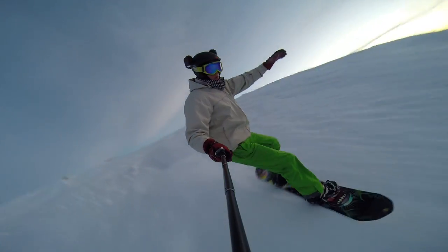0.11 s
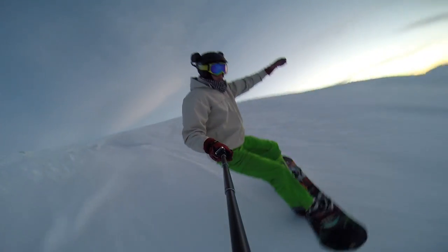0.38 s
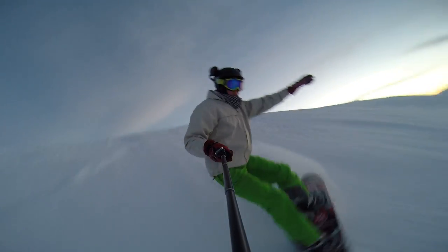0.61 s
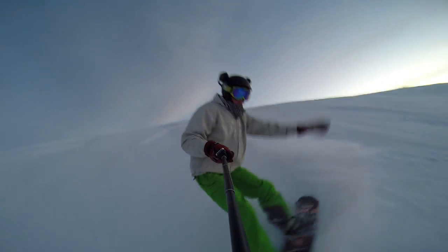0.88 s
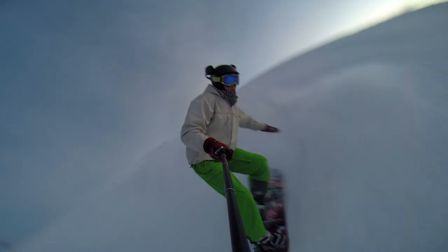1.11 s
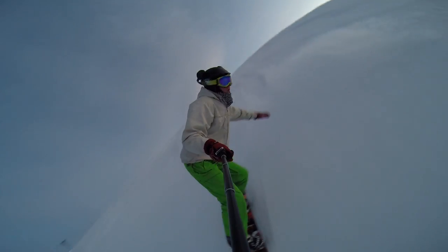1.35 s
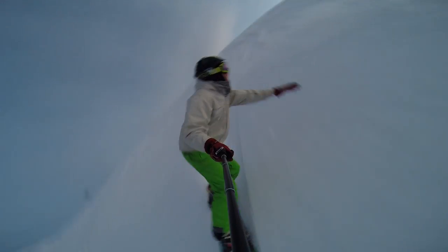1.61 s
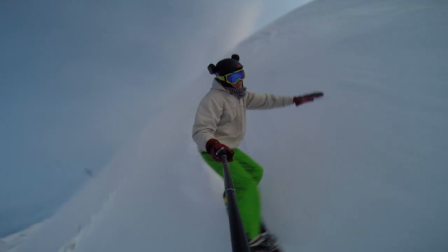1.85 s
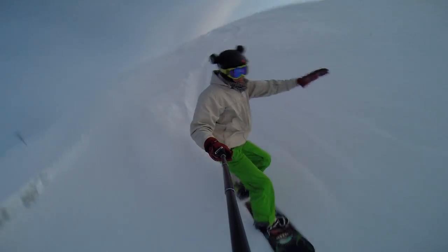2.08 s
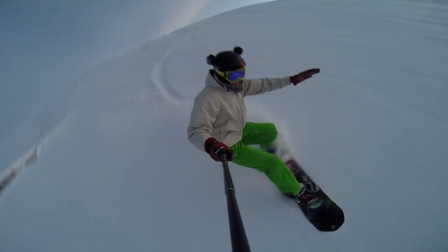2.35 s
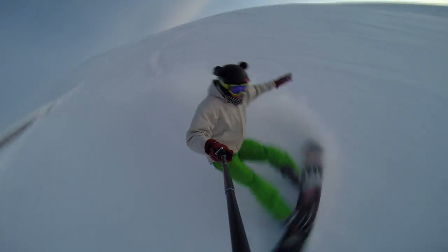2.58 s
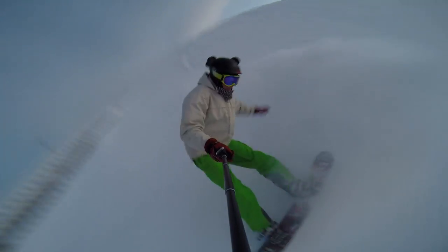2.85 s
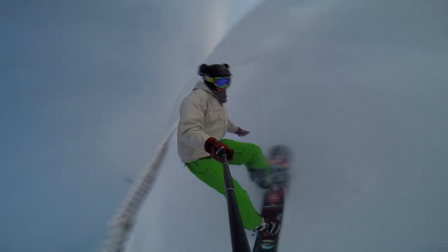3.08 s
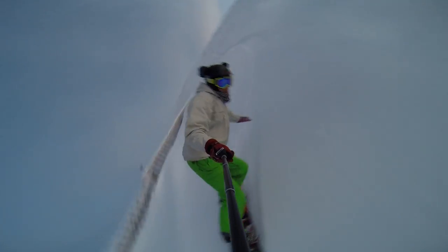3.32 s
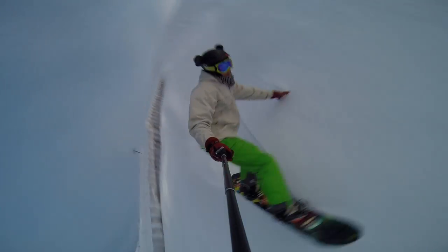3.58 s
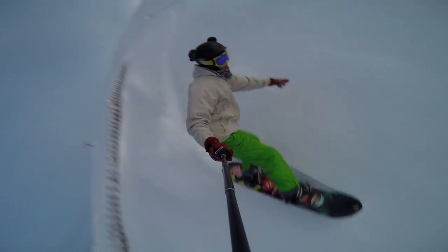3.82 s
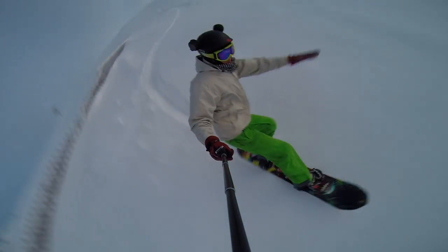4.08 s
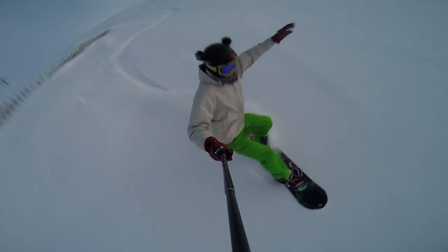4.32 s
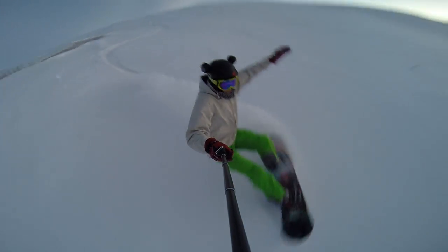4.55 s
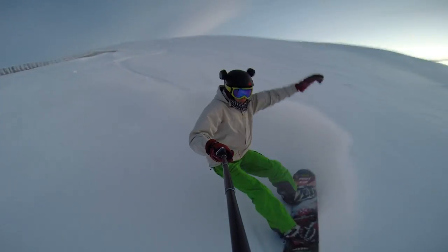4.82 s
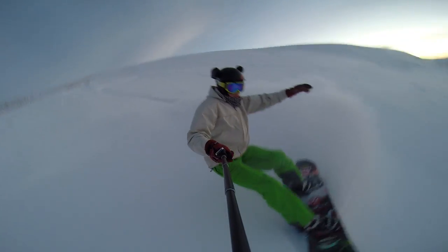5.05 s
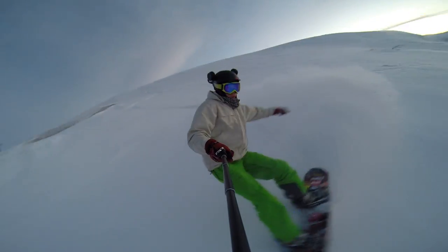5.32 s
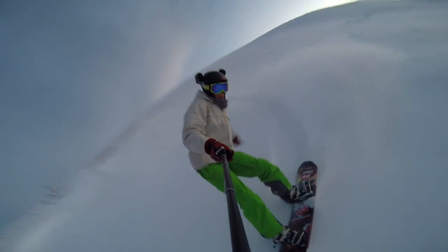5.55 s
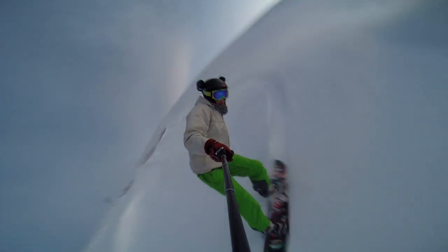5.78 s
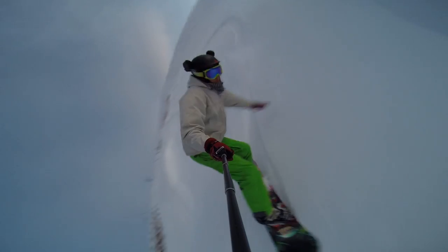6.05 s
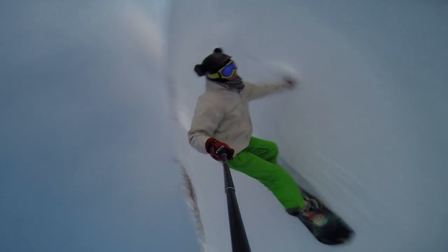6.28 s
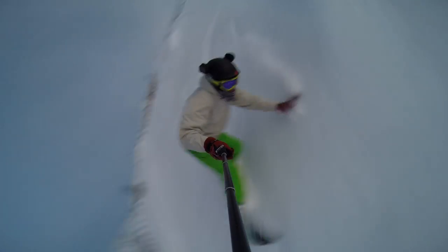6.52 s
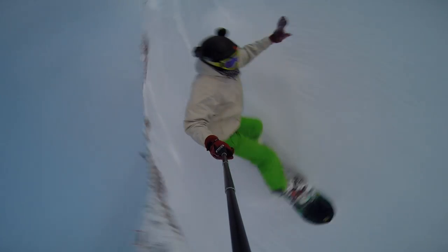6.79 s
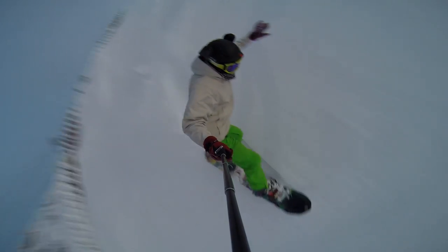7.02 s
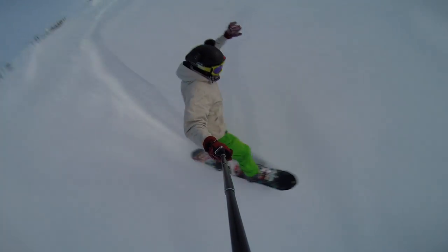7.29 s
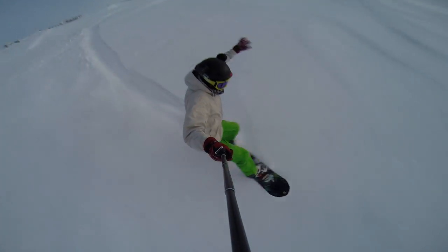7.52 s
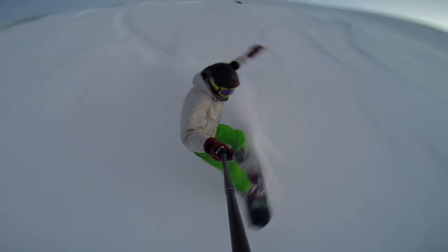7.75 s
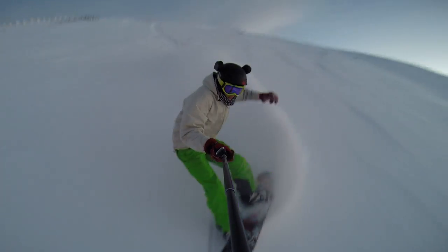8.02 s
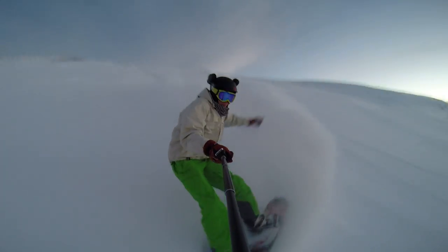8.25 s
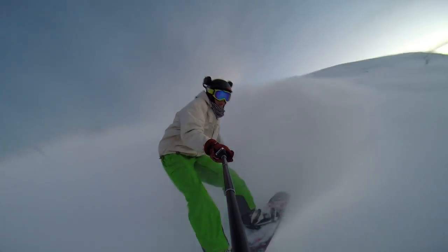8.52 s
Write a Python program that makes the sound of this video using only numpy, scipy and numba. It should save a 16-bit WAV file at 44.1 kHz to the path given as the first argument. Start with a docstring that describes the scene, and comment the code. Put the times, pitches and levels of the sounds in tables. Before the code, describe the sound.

A snowboard carves through powder with swelling, grainy hiss over low buffeting wind, with small icy ticks and one hard knock on a hollow pole.

```python
"""A rider carves powder snow holding a cased camera on a pole: noise with grains in it hisses through
the resonances of the case, with a fine top and a dull scrape. Spray rattles on the case in dense bursts,
grains of ice tick on it and blows ring the modes of the pole. Air sways the pole, sheds humming eddies,
buffets and whistles as moving bands of noise; the camera adds hiss, a faint whine and treble fizzes."""
import sys
import numpy as np
from scipy import signal
from scipy.fft import rfft, irfft, next_fast_len
from scipy.io import wavfile
from scipy.ndimage import uniform_filter1d
from numba import njit

SR = 44100
rng = np.random.default_rng(int(sys.argv[2]) if len(sys.argv) > 2 else 0)


def invert_db(level):
    """Linear amplitude ratio for a level in decibels (20 dB per decade), elementwise."""
    return 10 ** (np.asarray(level, dtype=float) / 20)


def store_pcm(level_fs):
    """Save levels as 16-bit WAV."""
    pcm = np.round(np.clip(level_fs, -1, 1) * 32767).astype(np.int16)
    wavfile.write(sys.argv[1], SR, np.atleast_2d(pcm).T)


N = 380573  # samples

# Spectrum of the preamplifier hiss. Each row: frequency in Hz, relative density in dB per Hz.
HISS_SPECTRUM = [(100, -4), (140, -8.5), (450, -9.5), (820, -16), (1250, -10), (1900, -21), (2900, -11),
                 (3900, -20), (5600, -12.5), (6200, -21), (10000, -23.5), (11500, -26), (12600, -19),
                 (14000, -23), (15000, -25), (15300, -43)]
# Whine of the electronics. Each row: tone in Hz, level in dB, level in dB of a twin one frame rate higher.
WHINE_TONES = [(2907, -78, -66), (5844, -69, -76), (11688, -73, -74), (14625, -72, -84)]
# Air past pole and case; eddies shed faster as the pole sweeps round.
# Each row: time in seconds, eddy pitch in Hz, eddy level in dB, turbulence level in dB, whistle level in dB.
AIR_STREAM = [(0, 50, -47.5, -55.5, -57), (.41, 50, -40.5, -62, -71), (1.0, 45.6, -39, -64, -59),
              (1.25, 49.6, -49, -67, -58.5), (1.75, 53.4, -36, -62, -55), (2.25, 50.4, -52, -73.5, -58),
              (2.55, 56, -35.5, -66, -58.5), (2.82, 48, -43, -54.5, -59), (3.2, 52, -51, -92, -71),
              (3.48, 50, -50, -57, -54), (3.6, 50.4, -45.5, -73, -66), (3.85, 52, -41, -65, -49.5),
              (4.05, 61, -41.5, -63.5, -54), (4.35, 82.7, -36, -68, -48.5), (4.66, 64, -34, -66, -57.5),
              (5.05, 52, -50, -64, -68), (5.65, 50, -47.5, -75, -55.5), (6.1, 47.7, -52.5, -76, -77),
              (6.42, 46, -36, -50, -49.5), (6.65, 46.4, -47, -65.5, -60), (6.92, 50.4, -36, -65, -47),
              (7.3, 64.4, -39.5, -66, -57), (7.5, 90.4, -35, -61.5, -50), (7.68, 89, -42, -54.5, -50),
              (7.85, 119, -39, -49, -44.5), (8.15, 81, -40.5, -53, -54), (8.4, 62, -48, -63.5, -56.5),
              (8.5, 58, -45, -67, -49.5), (8.63, 55, -43, -71, -52)]
# How hard the pole sways in the hand. Each row: time in seconds, level in dB.
POLE_SWAY = [(0.0, -33), (0.55, -41.5), (0.67, -25.5), (0.98, -37), (1.1, -22.5), (1.18, -40), (1.32, -26),
             (1.39, -42), (1.61, -27.5), (1.66, -32), (1.83, -25), (1.87, -32.5), (2.83, -36.5),
             (2.88, -25), (3.32, -35), (3.36, -23.5), (3.51, -23), (3.56, -36.5), (3.82, -26), (3.99, -43),
             (4.08, -34.5), (6.05, -37.5), (6.44, -23.5), (6.47, -17), (6.99, -34), (7.43, -23.5),
             (7.62, -38.5), (8.32, -16), (8.61, -24.5), (8.63, -27)]
# Resonances rung by the wind. Each row: centre in Hz, width in Hz, level in dB.
WIND_RESONANCES = [(290, 12, 3), (380, 35, -3)]
# An eddy tone that climbs in the last turn. Each row: time in seconds, pitch in Hz, level in dB.
HOWL_CURVE = [(7.25, 138, -89), (7.4, 154.6, -49), (7.55, 161, -42), (7.63, 167, -55), (7.7, 182, -37.5),
              (7.8, 202, -44.5), (7.95, 207.4, -61), (8.2, 200.6, -73), (8.4, 196, -77)]
# Short clear puffs of the whistle. Each row: start in seconds, length in seconds, nominal top pitch in Hz,
# level in dB.
WHISTLE_PUFFS = [(1.822, 0.057, 1466, -47), (1.92, 0.085, 1463, -49), (2.472, 0.075, 1390, -55),
                 (2.569, 0.046, 1400, -49.5), (6.901, 0.059, 1600, -45)]
# Modes of the struck pole and case. Each row: frequency in Hz, level in dB, time to fall 60 dB in seconds.
BODY_MODES = [(24.3, -20, 0.32), (58, -5, 0.35), (92, -4, 0.068), (124, 2, 0.052), (177, 2, 0.078),
              (278, -11, 0.18), (391, -3.5, 0.12), (684, -4.5, .04), (920, -5, 0.026), (1300, 1, 0.042),
              (1426, 0.5, 0.021), (1800, 5, 0.016), (2250, 2.5, 0.012), (2520, -0.5, 0.027),
              (3150, 3, 0.015), (3430, -2, 0.016), (4270, -16, 0.011)]
# Blows on the pole. Each row: start in seconds, peak of the high modes in dB, thud gain in dB re that peak,
# upper edge of the contact's band in Hz, time in seconds at which the contact is hardest.
POLE_BLOWS = [(0.5913, -32, -7, 1900, 0.0018), (0.5947, -17, -11, 4130, 0.00087),
              (0.637, -27.5, -20, 3480, 0.0023), (0.64, -35, 11, 2000, 0.0018),
              (6.4423, -4.5, -6.5, 4800, 0.00075), (6.4432, -15.5, -14, 2330, 0.0016),
              (6.454, -20.5, 1, 1730, 0.0018)]
# Single grains of ice on the case. Each row: start in seconds, level in dB, pitch in Hz.
ICE_TICKS = [(0.081, -29.5, 2630), (0.925, -26.5, 4800), (1.7337, -31.5, 2980), (2.071, -27.5, 2800),
             (3.1725, -30, 2630), (3.3204, -27, 1820), (4.6524, -42, 2930), (4.6907, -34, 3300),
             (4.753, -23.5, 3570), (4.805, -26, 2500), (4.81, -29.5, 1300), (4.928, -25.5, 2940),
             (4.938, -30, 2600), (5.7304, -40, 2370), (5.8575, -29, 3220), (6.524, -37, 2930),
             (6.577, -24, 1810), (6.759, -49, 1750), (7.167, -33, 1970), (7.541, -35, 2950),
             (7.9042, -27, 1860), (8.0512, -23.5, 2240), (8.2781, -21.5, 2390)]
# Resonances that colour the snow. Each row: centre in Hz, width in Hz, level in dB.
CASE_RESONANCES = [(2203, 260, 5), (2725, 310, 7.5), (3370, 270, 2), (4667, 240, 3.5), (4946, 290, 0),
                   (5520, 300, -12.5), (6660, 240, -6.5)]
# Sheets of spray thrown on the case. Each row: start in seconds, nominal length in seconds, level in dB,
# icy treble in dB re the sheet, heavy bass in dB re the sheet.
SPRAY_SHEETS = [(0.75, 0.054, -40.5, -25, -13), (2.714, 0.099, -43, -9, -10), (2.953, 0.067, -38, -25, -24),
                (2.963, 0.029, -41, -29, -7), (3.379, 0.1, -44, -23, -8), (3.69, 0.1, -29.5, -1.5, -16),
                (3.784, 0.035, -38, 2.5, -9), (3.84, 0.0098, -51, 9, -18), (6.196, 0.032, -48.5, 2.5, -10),
                (6.268, 0.055, -59.5, 11, -10), (6.302, 0.047, -39.5, -8, -9)]
# Board in the snow. Each row: time in seconds, hiss in dB, fine spray in dB, finest spray in dB,
# dull scrape in dB.
BOARD_CARVE = [(0, -54.5, -67, -66, -64), (.31, -51.5, -67, -69, -72), (.55, -51.5, -64, -60.5, -69),
               (.72, -48.5, -63, -64, -60), (.85, -46, -59, -57, -64), (1.08, -47, -56.5, -59, -63),
               (1.17, -54.5, -67, -68, -71), (1.3, -53, -61.5, -68, -65), (1.75, -53, -61, -62.5, -63.5),
               (2.3, -61, -70, -71, -68), (2.52, -58, -68, -68, -66), (2.8, -44, -56.5, -58.5, -65),
               (3.0, -47.5, -57, -62, -64), (3.13, -60.5, -63.5, -68, -88), (3.45, -54, -58.5, -64, -78),
               (3.94, -50.5, -59.5, -64, -63), (4.13, -55, -58.5, -64.5, -64), (4.35, -59.5, -79, -71, -60),
               (4.59, -56.5, -65, -70, -62), (4.8, -50, -61, -60, -68), (5.2, -49, -64, -60.5, -70),
               (5.67, -46.5, -55.5, -55, -67), (5.94, -47.5, -59, -62, -70), (6.12, -56.5, -60.5, -65, -81),
               (6.37, -47, -63, -65, -58), (6.6, -60, -66, -71, -67), (6.92, -56.5, -70, -72, -61),
               (7.25, -59.5, -65, -69, -64.5), (7.45, -56.5, -69, -72, -58), (7.72, -48.5, -63, -68, -51),
               (8.0, -51, -59.5, -65, -48.5), (8.37, -47.5, -54.5, -60, -57), (8.63, -51.5, -61, -67, -63)]


def unit(x):
    """Scale to rms 1."""
    return x / np.sqrt(np.mean(x ** 2))


def columns(table):
    """Table columns as curves over all samples."""
    s, *rest = np.transpose(table)
    return [np.interp(np.arange(N) / SR, s, c) for c in rest]


@njit
def moving_band(x, hz, width):
    """State-variable band-pass with a moving centre, gain 1 there."""
    y, b, l = np.empty(len(x)), 0., 0.
    for i in range(len(x)):
        g, k = np.tan(np.pi * hz[i] / SR), width / hz[i]
        v = (b + g * (x[i] - l)) / (1 + g * (g + k))
        b, l, y[i] = 2 * v - b, l + 2 * g * v, k * v
    return y


def tuned_noise(hz, first_width, second_width):
    """Noise through two moving band-passes in a row, widths in Hz: a breathy pitch at rms 1."""
    once = moving_band(rng.standard_normal(len(hz)), hz, first_width)
    return unit(moving_band(once, hz, second_width))


def band(x, hz, width_hz):
    """Fixed resonance."""
    return signal.lfilter(*signal.iirpeak(hz, hz / width_hz, SR), x)


def bandpass(x, lo_hz, hi_hz, order=3):
    """Butterworth band with its level left as it falls."""
    return signal.sosfilt(signal.butter(order, [lo_hz, hi_hz], "band", fs=SR, output="sos"), x)


def steep(x, lo_hz, hi_hz, order=3):
    """Band with steep skirts, rms 1."""
    return unit(bandpass(x, lo_hz, hi_hz, order))


def noise():
    """White noise."""
    return rng.standard_normal(N)


def walk(rate):
    """Random levels held 1 / rate s and slewed twice; spread near 1."""
    k = int(SR / rate)
    held = np.repeat(rng.standard_normal(N // k + 1), k)
    return 1.29 * uniform_filter1d(uniform_filter1d(held, k), k)[:N]


def phase(hz):
    """Running phase in radians of a moving pitch."""
    return 2 * np.pi * np.cumsum(hz) / SR


def grains(density, spread_db):
    """Sparse clicks of very uneven size, density per second."""
    hits = rng.random(N) < density / SR
    return unit(hits * noise() * invert_db(spread_db * rng.exponential(size=N)))


def add(out, s, sound):
    """Mix a sound in at time s."""
    i = int(s * SR)
    out[i:i + len(sound)] += sound[:N - i]


def preamp_hiss():
    """Noise of the preamplifier, shaped in the spectrum."""
    hz, db = np.transpose(HISS_SPECTRUM)
    size = next_fast_len(N)
    bins = np.fft.rfftfreq(size, 1 / SR) + 1
    tilt = invert_db(np.interp(np.log(bins), np.log(hz + 1), db))
    return invert_db(-56.5) * unit(irfft(rfft(noise(), size) * tilt, size)[:N])


def electronic_whine():
    """Steady tones in pairs one frame rate apart, each wandering slightly in phase."""
    frame_hz = 30
    t = np.arange(N) / SR

    def tone(hz, db):
        return invert_db(db) * np.sqrt(2) * np.sin(2 * np.pi * hz * t + 0.5 * walk(6.6))

    return sum(tone(hz, db) + tone(hz + frame_hz, twin_db) for hz, db, twin_db in WHINE_TONES)


def fizzes():
    """Short top-treble bursts locked to the picture frames, about every fourth one."""
    picture_s, lag_s = 1.001 / 30, 0.019
    first, spacing, slip_spread = 1.8, 4.19, 0.15  # in picture frames
    level_db, spread_db = -60.51, 2
    gate, t = np.zeros(N), np.arange(2600) / SR
    shape = np.minimum(t / 0.0025, 1) * np.exp(-(t / 0.019) ** 2)
    beats = np.arange(first, N / SR / picture_s - 1, spacing)
    for beat, (slip, size) in zip(beats, rng.standard_normal((len(beats), 2))):
        s = lag_s + picture_s * np.round(beat + slip_spread * slip)
        add(gate, s, invert_db(level_db + spread_db * size) * shape)
    return gate * steep(noise(), 12200, 15200, order=2)


def pole_sway():
    """The pole sways near its lowest mode: a wandering deep tone with low noise around it."""
    level_db, = columns(POLE_SWAY)
    sway = np.sin(phase(26.5 + 2.49 * walk(7.8))) + 0.38 * steep(noise(), 15.6, 41.4)
    return invert_db(level_db) * unit(invert_db(2.8 * walk(8)) * sway)


def eddies():
    """Eddies shed by the pole hum at a pitch set by the speed of the air."""
    eddy_hz, eddy_db, _, _ = columns(AIR_STREAM)
    hum = tuned_noise(eddy_hz, 22.0, 17.6) + steep(noise(), 40.1, 61.3)
    return invert_db(eddy_db) * unit(invert_db(2.8 * walk(11)) * hum)


def turbulence():
    """Rough air rings two resonances and fills the bass with buffeting and a slower-swelling rumble."""
    _, _, turbulence_db, _ = columns(AIR_STREAM)
    rough = invert_db(2.7 * walk(11)) * noise()
    rung = unit(sum(invert_db(db) * band(rough, hz, width) for hz, width, db in WIND_RESONANCES))
    buffet = rung + 0.92 * steep(rough, 218, 415, order=4)
    rumble = invert_db(4.1 * walk(4.1)) * steep(rough, 133, 194)
    return invert_db(turbulence_db) * (unit(buffet) + invert_db(-0.5) * unit(rumble))


def whistle():
    """A gap in the case whistles: narrow noise drifting in pitch and flickering in level."""
    _, _, _, whistle_db = columns(AIR_STREAM)
    centre_hz, drift_hz = 1319, 44.3
    breath = tuned_noise(centre_hz + drift_hz * walk(7), 285.0, 600.0)
    flicker = invert_db(1.9 * walk(30) + 2.2 * walk(11))
    return invert_db(whistle_db) * unit(flicker * breath)


def howl():
    """Eddies lock into one unsteady tone that climbs in the last turn, then sags a little."""
    howl_hz, howl_db = columns(HOWL_CURVE)
    tone = np.sin(phase(howl_hz + 6 * walk(22)))
    return invert_db(howl_db) * unit(invert_db(2.4 * walk(20)) * tone)


def puffs():
    """The gap in the case sings for a moment when a gust meets it squarely, arching up in pitch and back."""
    out = np.zeros(N)
    for s, length, top_hz, db in WHISTLE_PUFFS:
        arch = np.sin(np.linspace(0, np.pi, int(length * SR)))
        hz = top_hz * (0.86 + 0.154 * arch)
        add(out, s, invert_db(db) * arch * tuned_noise(hz, 70., 110.))
    return out


def knocks():
    """A blow chatters for a few ms into the high modes; the low modes take it as one rounded push."""
    out, t = np.zeros(N), np.arange(SR // 2) / SR
    modes = [(hz, invert_db(db) * np.sin(2 * np.pi * hz * t) * np.exp(-np.log(1000) * t / t60))
             for hz, db, t60 in BODY_MODES]
    low_modes = sum(m for hz, m in modes if hz < 500)
    high_modes = sum(m for hz, m in modes if hz > 500)
    thud = np.convolve(low_modes, signal.windows.hann(180) / 90)
    for s, peak_db, thud_db, bright_hz, chatter_s in POLE_BLOWS:
        u = t[:600] / chatter_s
        contact = 0.43 * rng.standard_normal(600) * u * np.exp(-u)
        contact[int(chatter_s * SR)] = 0.52  # one sharp tap at the height of the contact
        high = np.convolve(high_modes, bandpass(contact, 950, bright_hz))
        add(out, s, invert_db(peak_db) * high / np.abs(high).max())
        add(out, s, invert_db(peak_db + thud_db) * thud)
    return out


def ticks():
    """Each grain is a soft click of a few cycles and a crumble of smaller bits."""
    out, t = np.zeros(N), np.arange(600) / SR
    for s, db, hz in ICE_TICKS:
        click = np.sin(2 * np.pi * hz * t) * t / 0.00018 * np.exp(-t / 0.00029)
        bits = steep(rng.standard_normal(600), 1000, 5500)
        crumble = bits * t / 0.0024 * np.exp(-t / 0.0015)
        add(out, s, invert_db(db) * (click + 0.56 * crumble))
    return out


def cased(x):
    """Snow sound below 6 kHz as the closed case passes it, neighbouring resonances in opposite sign."""
    rung = sum((-1) ** k * invert_db(db) * band(x, hz, width) for k, (hz, width, db) in enumerate(CASE_RESONANCES))
    return unit(unit(rung) + 0.49 * steep(x, 1460, 6000))


def spray():
    """Each sheet lands at once, rattles densely on the case and thins out."""
    gates = np.zeros((3, N))  # body, icy, heavy
    rattle = noise() + 0.97 * grains(1500, 2.7)
    body = cased(rattle) + 0.32 * steep(rattle, 1026, 1390)
    icy = unit(band(rattle, 3580, 300) + band(rattle, 4470, 410))
    icy = icy + 0.31 * steep(rattle, 6910, 8040) + 0.068 * steep(rattle, 11500, 11600)
    heavy = steep(rattle, 230, 610, order=2)
    for s, length, db, icy_db, heavy_db in SPRAY_SHEETS:
        t = np.arange(int(2.5 * length * SR)) / SR
        onset = np.minimum(t / (0.13 * length), 1) ** 2
        shape = onset * np.exp(-(t / length) ** 4 - 0.5 * t / length)
        for gate, part_db in zip(gates, (0, icy_db, heavy_db)):
            add(gate, s, invert_db(db + part_db) * shape)
    return gates[0] * body + gates[1] * icy + gates[2] * heavy


def snow():
    """Crystals shear under the board: noise with grains in it, swelling in gusts."""
    hiss_db, fine_db, finest_db, scrape_db = columns(BOARD_CARVE)
    gust = invert_db(walk(18))
    shear = gust * (noise() + 0.6 * grains(1200, 0.57))
    hiss = invert_db(hiss_db) * cased(shear)
    fine = invert_db(fine_db + walk(14)) * steep(shear, 7340, 8440, order=2)
    finest = invert_db(finest_db + 1.7 * walk(12)) * steep(shear, 9400, 11900, order=2)
    dull = steep(shear, 623, 1025, order=4)
    dull = dull + 0.5 * unit(band(shear, 1820, 90)) + 0.5 * steep(shear, 1170, 2460)
    scrape = invert_db(scrape_db + 1.1 * walk(11)) * unit(dull)
    return hiss + fine + finest + scrape


def scene():
    """All sources, one microphone."""
    camera = preamp_hiss() + electronic_whine() + fizzes()
    wind = pole_sway() + eddies() + turbulence() + whistle() + howl() + puffs()
    strikes = knocks() + ticks() + spray()
    return (camera + wind + strikes + snow())[None]


def band_limit(x):
    """A steep low-pass at the top of the band."""
    return signal.sosfilt(signal.butter(12, 15560, fs=SR, output="sos"), x)


def record(dry):
    """The microphone rounds the hardest blow and the top rolls off steeply."""
    rounded = 0.82 * np.tanh(dry / 0.8)
    mix = signal.sosfilt(signal.ellip(8, 0.3, 60, 15250, fs=SR, output="sos"), rounded)
    return band_limit(mix)


dry = scene()
out = record(dry)
store_pcm(out)
```